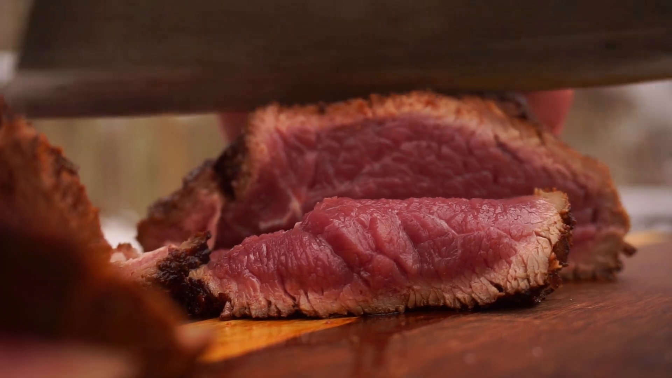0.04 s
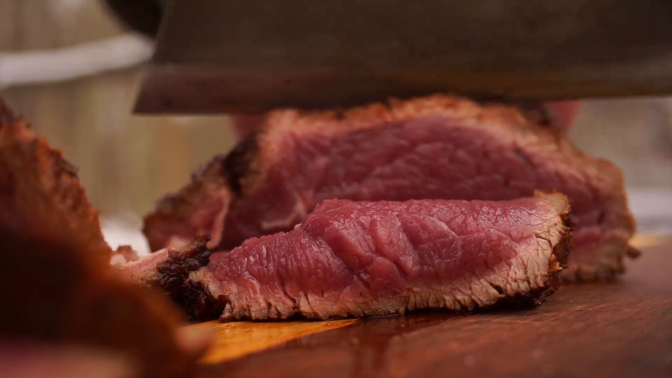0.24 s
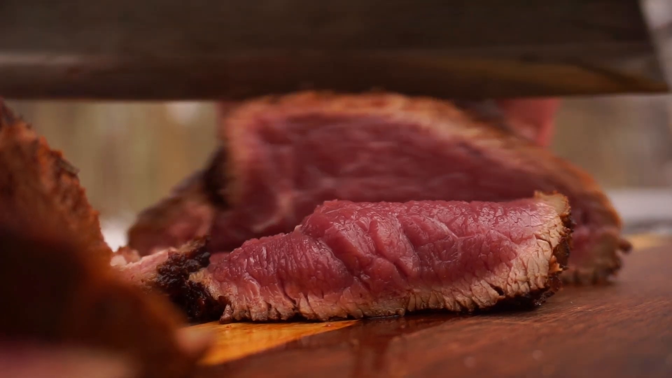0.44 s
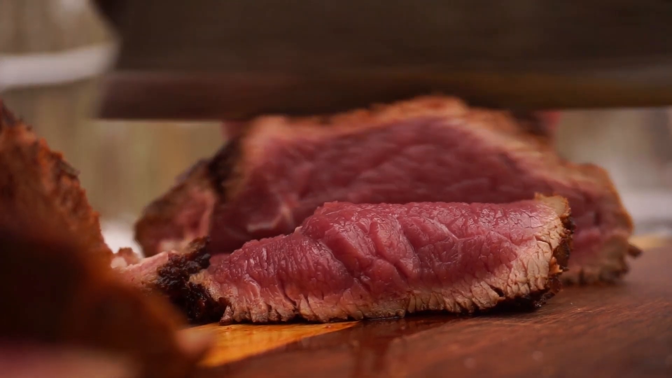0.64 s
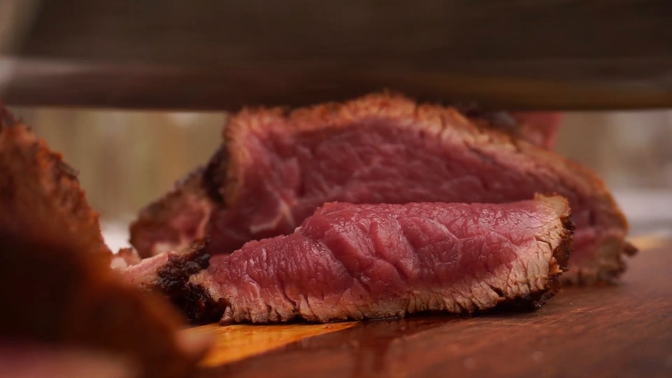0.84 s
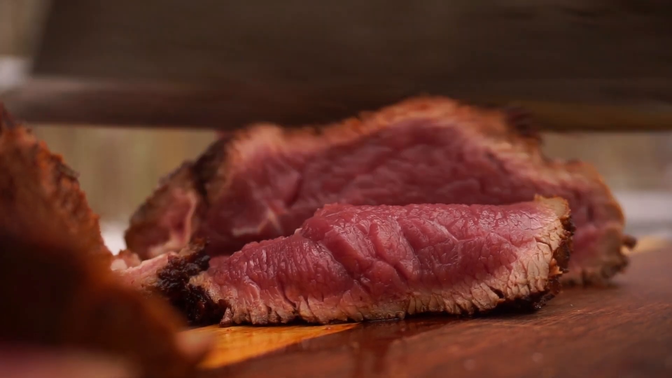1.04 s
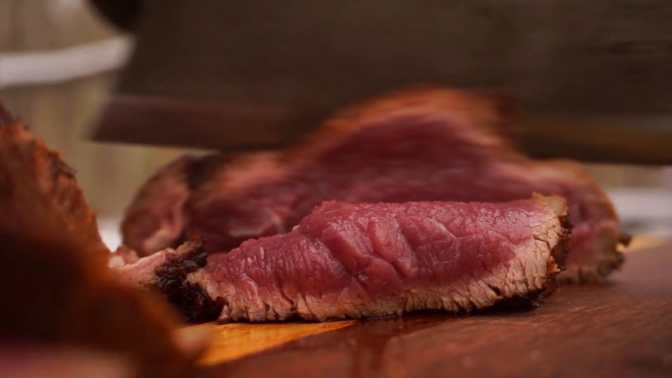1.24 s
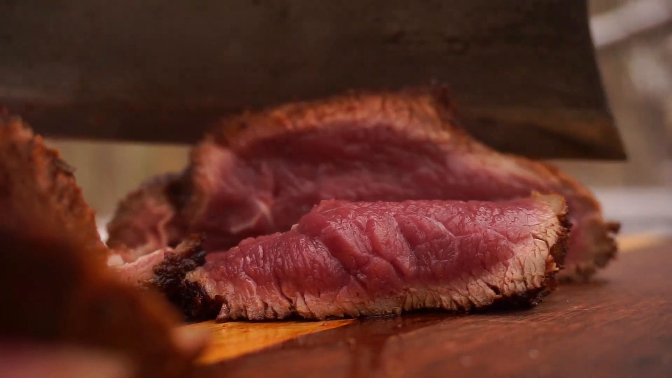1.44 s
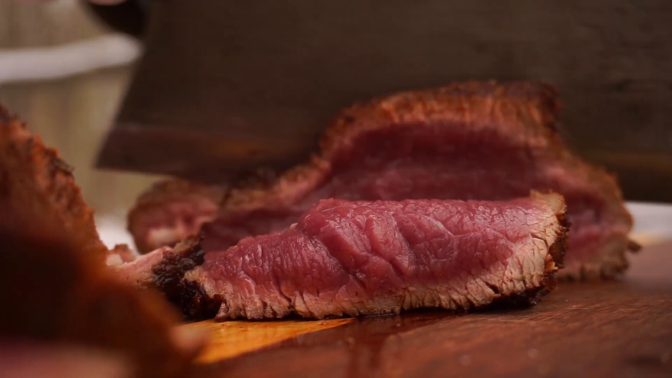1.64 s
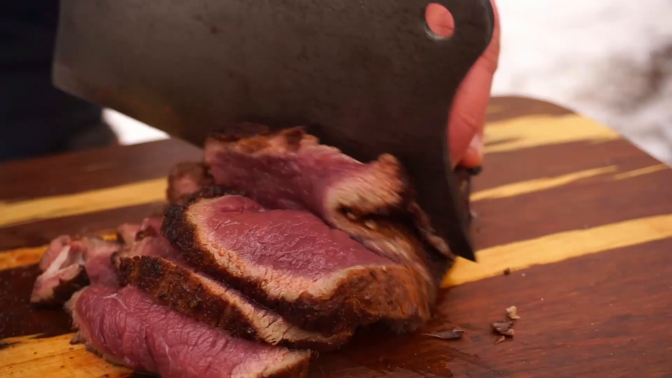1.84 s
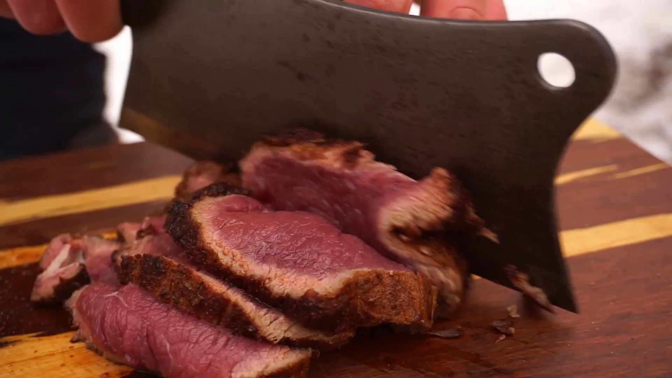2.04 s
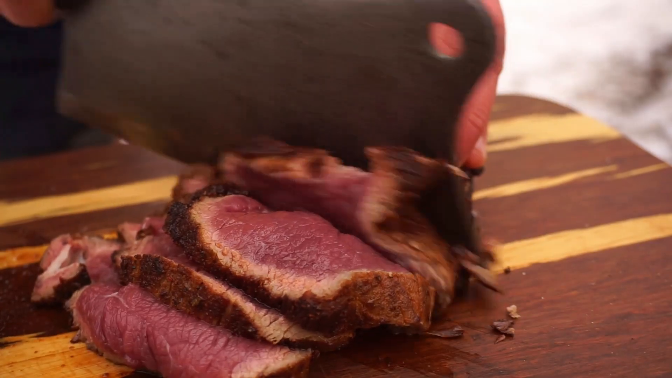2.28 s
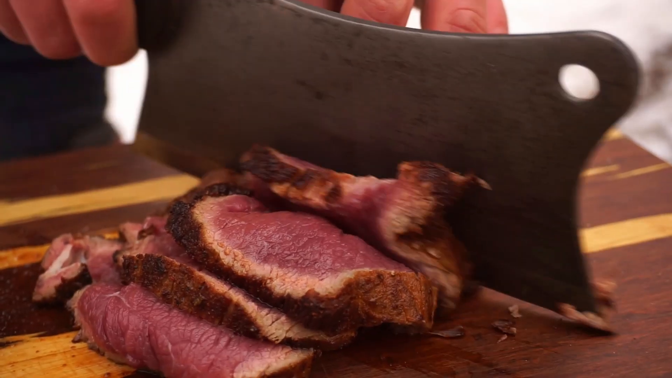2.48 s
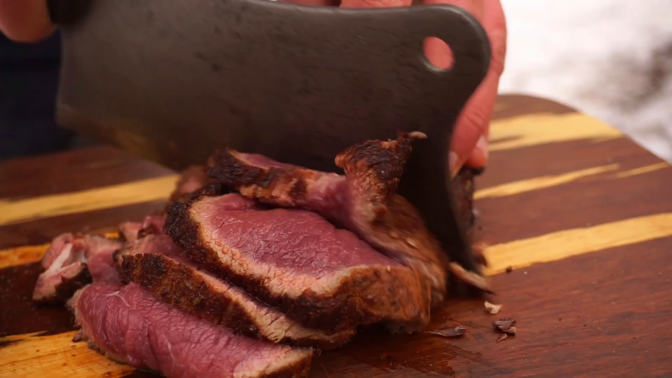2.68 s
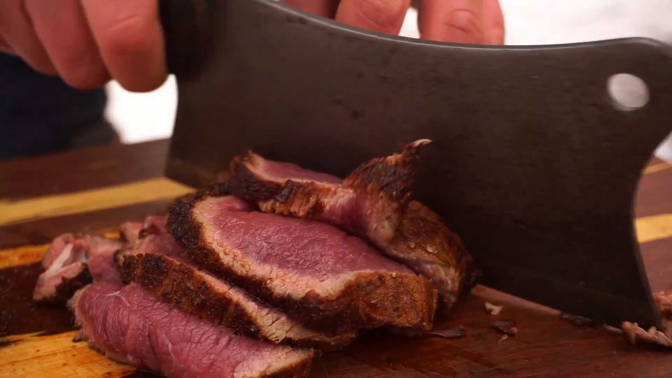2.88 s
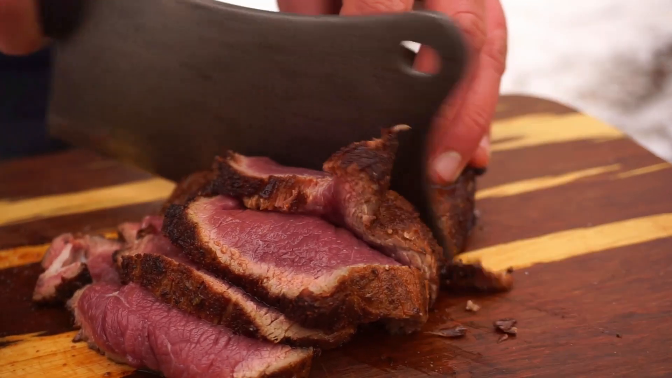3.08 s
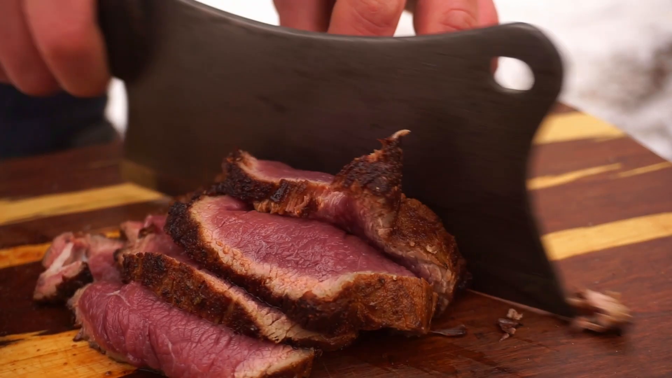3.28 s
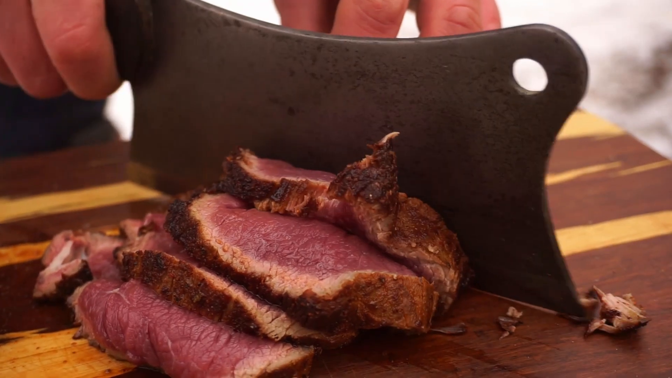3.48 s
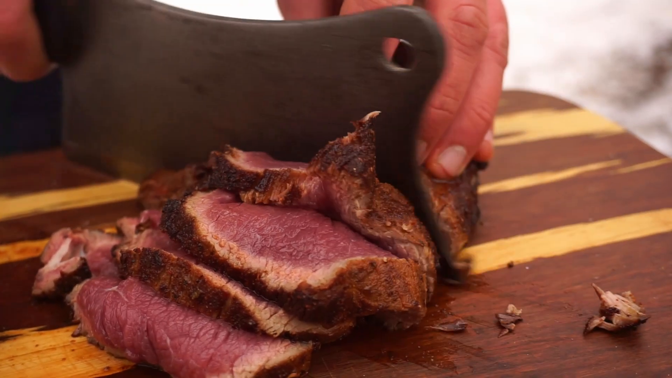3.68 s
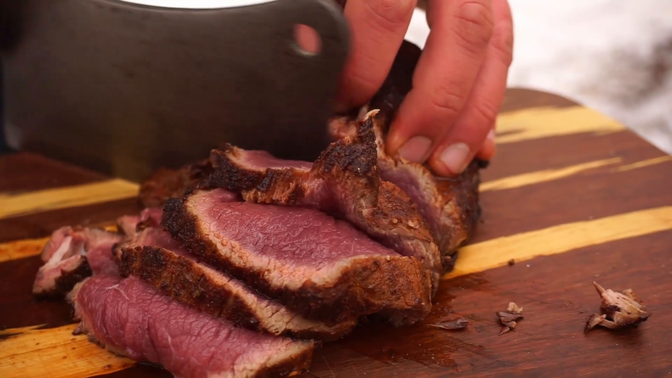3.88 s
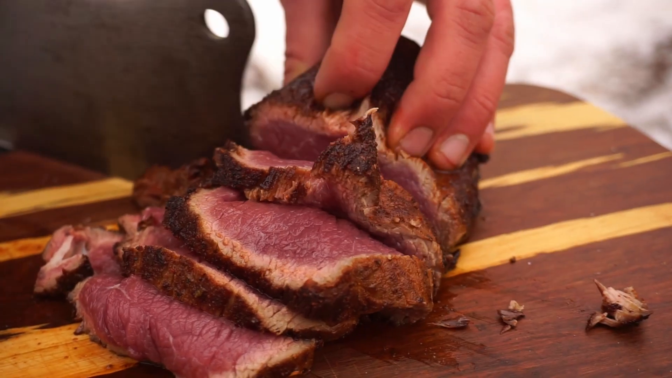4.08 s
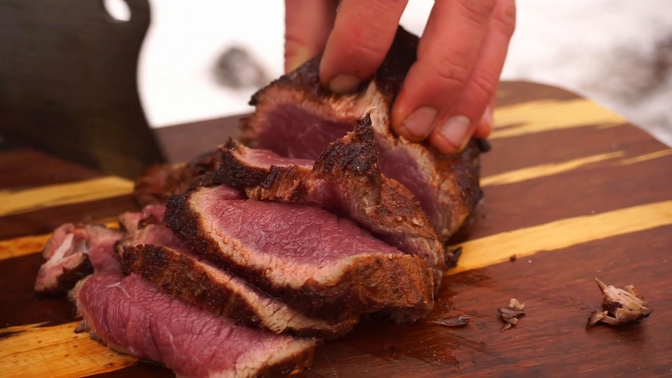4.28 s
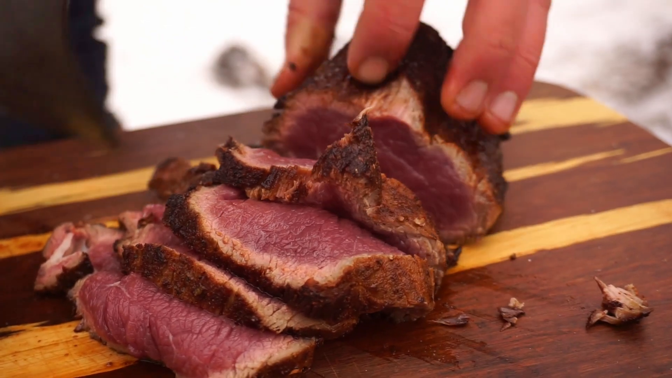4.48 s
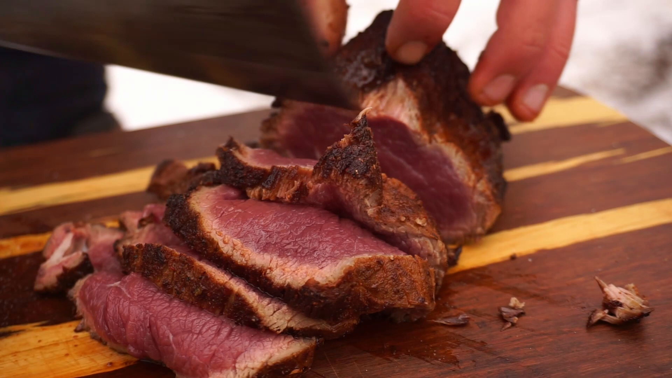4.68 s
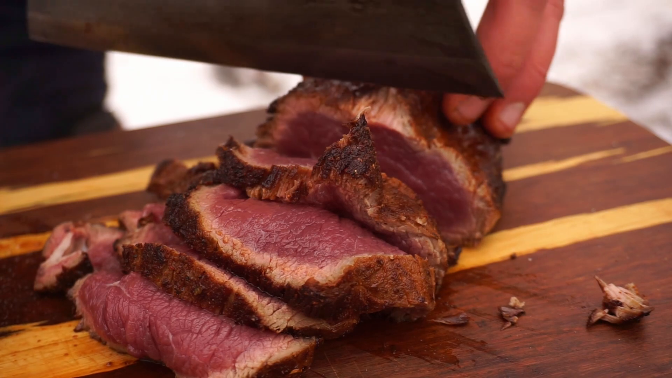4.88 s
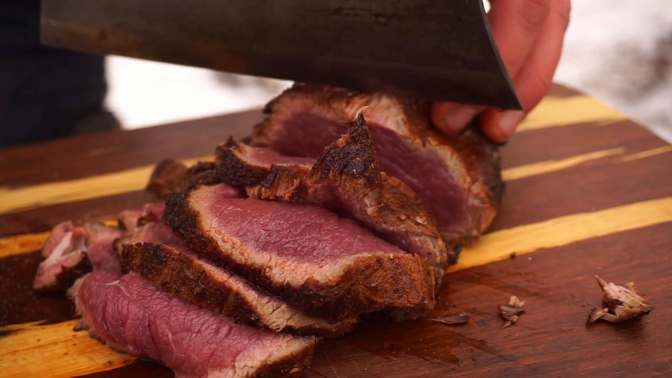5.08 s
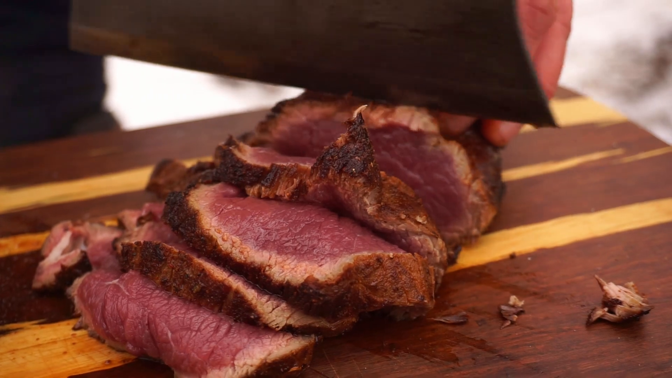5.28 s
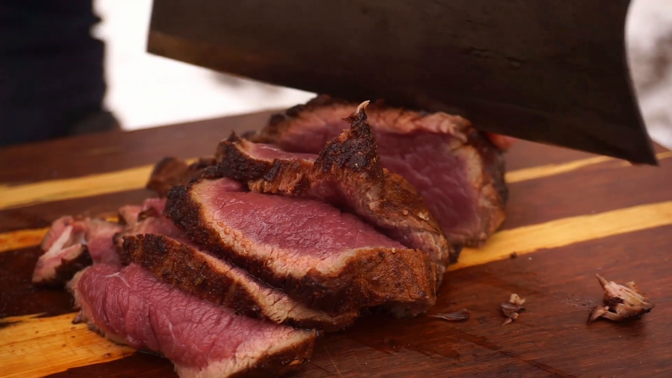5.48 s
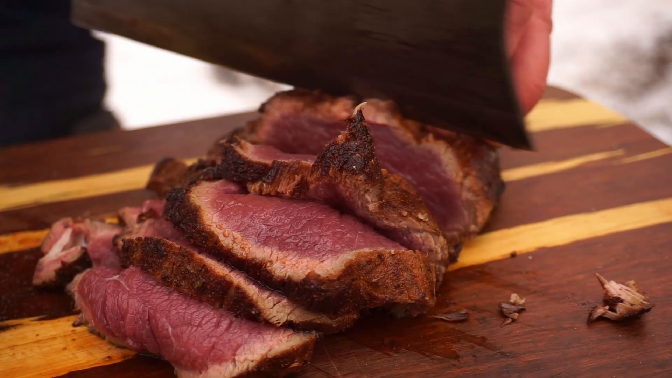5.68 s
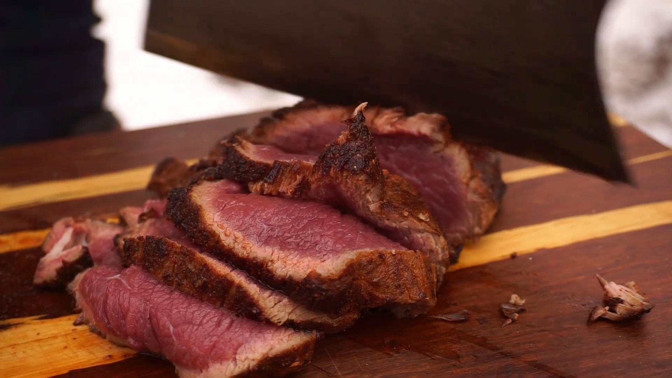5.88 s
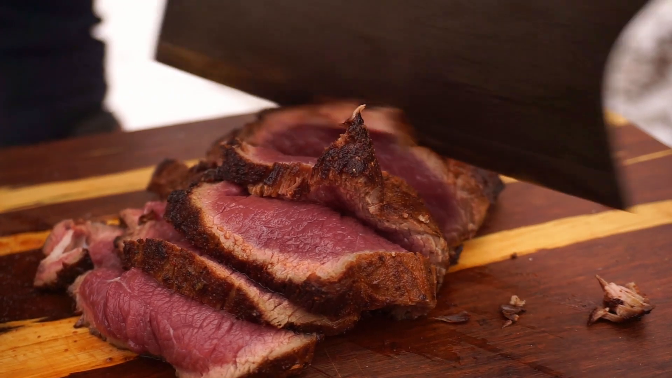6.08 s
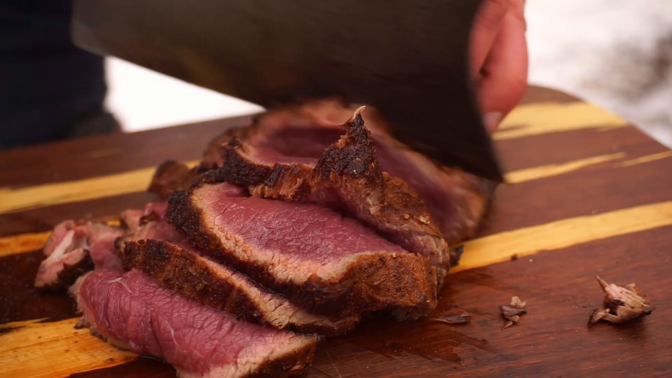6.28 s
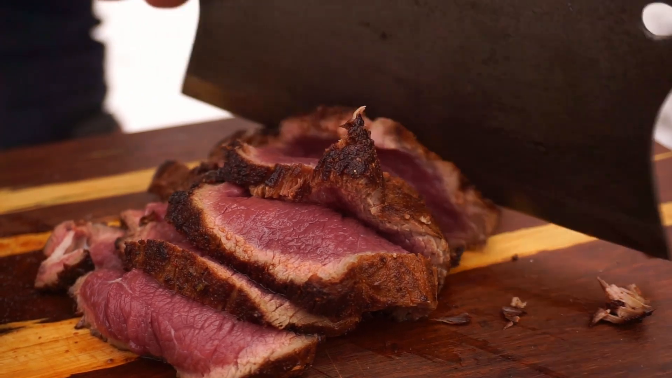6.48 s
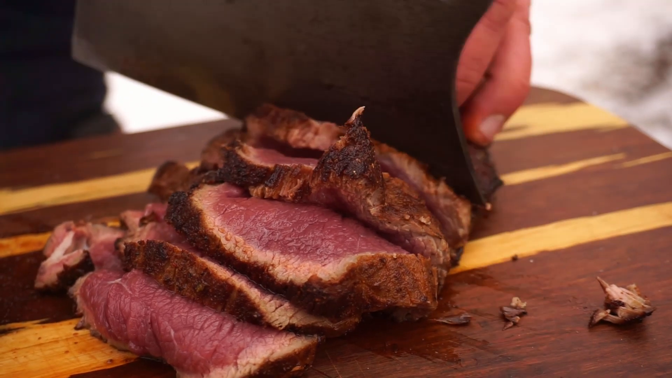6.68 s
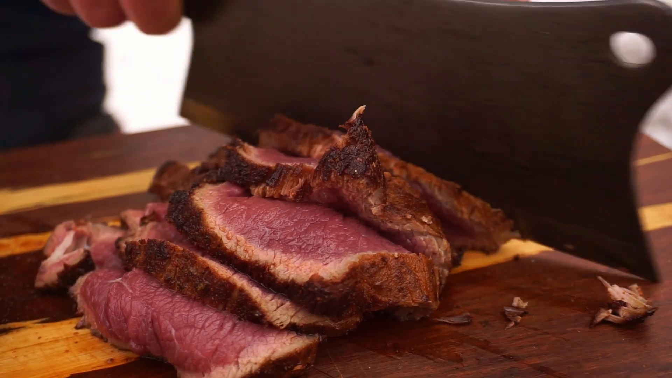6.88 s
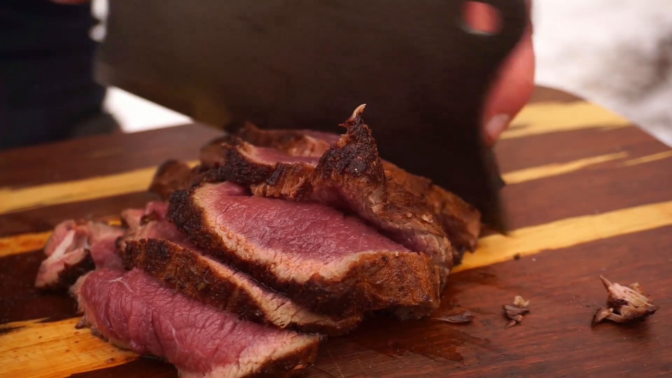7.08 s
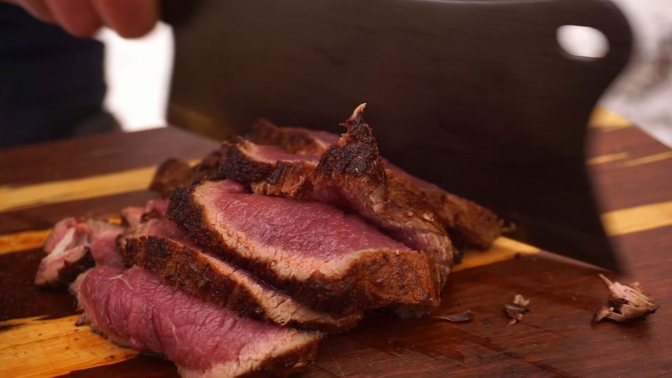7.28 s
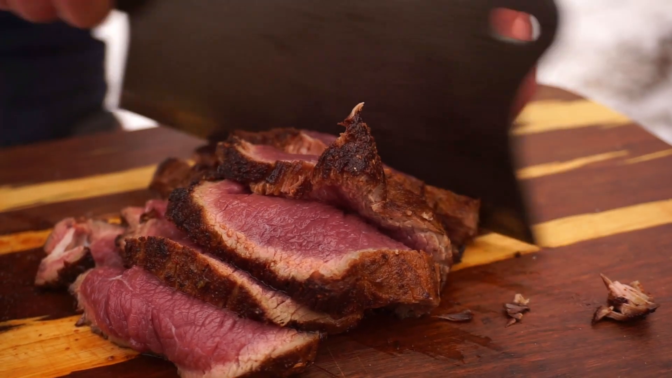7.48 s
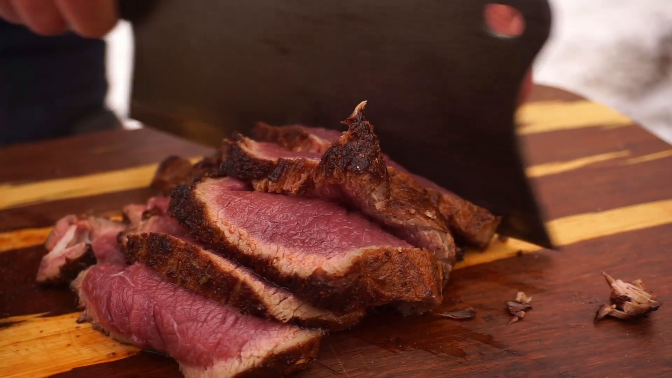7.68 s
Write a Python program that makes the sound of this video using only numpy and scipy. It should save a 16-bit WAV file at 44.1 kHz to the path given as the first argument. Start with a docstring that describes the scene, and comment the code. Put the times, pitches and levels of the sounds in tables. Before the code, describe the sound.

Close stereo pickup of a heavy steel blade sawing seared meat on a wooden board outdoors. Soft fibrous strokes with faint squeaks and crackles come first, then a hard knock and louder woody rasps. A scraping drag follows, then near quiet, gentler slicing, and one loudest sharp knock near the end. Faint wide airy rush; thin bass.

```python
"""Cleaver through seared steak, outdoors

A heavy blade saws meat on a wooden board in still air, heard in stereo over a wide soft rush of shaped noise.
Trains of tiny random slips ring wood and steel modes; flickering noise bands are the tearing fibre.
Filtered noise makes the steel squeaks, short pushes into the board modes make the knocks,
and decaying noise bursts make the snaps of crust and juice. The microphone is thin in the bass.
"""
import sys
import numpy as np
from scipy import signal
from scipy.fft import rfft, irfft, next_fast_len
from scipy.io import wavfile
from scipy.ndimage import map_coordinates

SR = 44100
rng = np.random.default_rng(int(sys.argv[2]) if len(sys.argv) > 2 else 0)


def output_pcm(signal):
    """Save a mono or channel-first signal as 16-bit PCM at the path in sys.argv[1].

    Samples are clipped to [-1, 1] before scaling.
    """
    pcm = np.clip(np.atleast_2d(signal).T, -1, 1) * 32767
    wavfile.write(sys.argv[1], SR, np.round(pcm).astype(np.int16))


N = 340893
PADDED = next_fast_len(N)

# background rush: f/Hz, density/dB per Hz (relative)
RUSH_SPECTRUM = [(60, -16.5), (200, -12), (400, -5.5), (650, -5.5), (860, -3), (1040, -4.5), (1300, 0.5),
                 (2050, -4.5), (2500, -1), (3000, -7.5), (3500, -4.5), (5000, -10), (9000, -12.5),
                 (12500, -13.5), (16000, -15.5)]
# its treble before the stereo tilt: t/s, level/dB
RUSH_TREBLE = [(0.0, -64), (3.21, -58.5), (3.34, -59), (4.11, -57), (5.1, -61.5), (6.59, -60.5),
               (7.73, -58)]
# left-right likeness of the rush: f/Hz, likeness/-1 to 1
RUSH_LIKENESS = [(60, 0.24), (180, 1), (550, 0.18), (1650, -0.14), (4970, -0.18), (15000, 0.26)]
# sawing strokes: fastest t/s, rise/s, fall/s,
# then gain/dB of edge on wood, low plate modes, high plate modes, tearing fibre
SAW_STROKES = [(0.13, .17, .27, -65, -54, -57, -58.5), (0.372, 0.061, 0.19, -66, -54, -52.5, -53.5),
               (0.643, .15, .16, -64, -53.5, -56.5, -54.5), (0.87, 0.08, 0.12, -72, -55, -53, -56.5),
               (1.161, 0.23, 0.065, -59.5, -51.5, -57, -56.5), (1.302, .038, 0.21, -68, -83, -68, -59.5),
               (1.665, .16, .055, -55.5, -47, -52, -54.5), (1.829, 0.088, 0.047, -67, -57.5, -63, -55.5),
               (2.009, 0.19, 0.15, -60.5, -54.5, -56.5, -57.5),
               (2.181, 0.11, 0.19, -58.5, -53.5, -56, -58.5), (2.437, .16, 0.093, -55.5, -47.5, -49.5, -53),
               (2.602, 0.14, .16, -47.5, -43.5, -48.5, -56.5), (2.796, 0.087, .22, -47.5, -42, -46, -54.5),
               (2.834, 0.01, 0.12, -30, -30, -37, -54.5), (3.011, 0.0055, 0.015, -31, -44, -55, -65),
               (3.058, .12, 0.049, -30.5, -30, -40, -49.5), (3.12, 0.049, .08, -54, -55, -53, -62),
               (3.298, 0.1, 0.1, -32.5, -31.5, -41.5, -50.5), (3.687, 0.2, 0.11, -37, -37, -44.5, -55.5),
               (5.59, 1, .48, -74, -60, -61.5, -62.5), (5.92, 0.12, .2, -75, -61.5, -57, -57.5),
               (6.188, 0.26, 0.17, -68, -56.5, -60, -57.5), (6.436, 0.2, 0.11, -61, -52.5, -53.5, -48),
               (6.586, 0.18, 0.47, -65.5, -56.5, -57, -57), (6.801, 0.053, .25, -67, -59, -53.5, -53),
               (6.914, .18, 0.14, -52.5, -52.5, -61, -79), (6.931, 0.0071, 0.021, -41, -67, -70, -70),
               (7.04, 0.12, 0.22, -63, -52.5, -54, -54.5), (7.3, 0.13, 0.14, -45.5, -48, -49, -53.5),
               (7.302, 0.02, 0.097, -21.5, -41, -45.5, -59), (7.439, .052, 0.045, -44.5, -43, -53.5, -60),
               (7.51, .184, 0.24, -59, -58.5, -59, -63), (7.732, 0.1, .05, -46.5, -42, -55, -58.5)]
# long drag across the board: t/s, gain/dB of wood, low plate, high plate, fibre
DRAG_GAINS = [(3.74, -53, -44.5, -52, -66), (3.796, -48.5, -44, -53, -62), (4.228, -43, -42, -50, -66),
              (4.316, -29.5, -44, -43, -59), (4.326, -26.5, -45, -41, -59), (4.386, -27, -47, -47.5, -63),
              (4.424, -29, -53.5, -54, -57), (4.446, -61, -54, -65, -67), (4.514, -71, -71, -73, -80),
              (4.52, -79, -65, -64, -70)]
# how far the plate lies over in the drag: t/s, share/0-1
LYING_SHARE = [(3.7, 0), (3.8, 1), (4.45, 1), (4.55, 0)]
# board modes: f/Hz, width/Hz (filters broaden or narrow it), level/dB (relative)
BOARD_MODES = [(265, 74, -19.5), (371, 59, -17), (472, 65, -3.5), (542, 111, -5), (684.4, 56, 0),
               (755.7, 46, 0), (843, 81, -2.5), (1038, 82, -16.5), (1235, 55, -4), (1900, 420, -12.5),
               (2140, 490, -18), (2880, 35, -14)]
# upright steel plate, damped by the meat: f/Hz, width/Hz of the narrower filter, level/dB (relative)
UPRIGHT_MODES = [(1163, 350, -7.5), (1680, 180, -3), (1936, 280, -2), (2328, 253, 0), (2786, 150, -1),
                 (3030, 97, 4.5), (3930, 860, -7), (4810, 400, -5), (5090, 750, -7.5), (5860, 156, -7),
                 (6370, 760, -12.5), (7184, 108, -5.5), (7950, 76, -39), (9200, 54, -24)]
# plate lying over: f/Hz, width/Hz of the narrower filter, level/dB (relative)
LYING_MODES = [(1250, 280, -4.5), (1830, 140, -2.5), (2140, 110, 0.5), (2920, 260, 3), (3950, 390, -7.5),
               (4670, 270, -9), (5460, 230, -5), (6600, 200, -9.5), (7550, 140, -12.5), (9600, 220, -24)]
# tearing fibre: f/Hz, density/dB per Hz (relative)
FIBRE_SPECTRUM = [(3000, -37), (5000, -8), (8000, -3), (10000, -4), (13000, -7.5), (16000, -7.5)]
# left-right likeness of rubbing, fibre and squeaks: f/Hz, likeness/0-1
RUB_LIKENESS = [(60, 0.92), (180, 1), (550, 0.94), (1650, 0.93), (4970, 0.24), (15000, 0.054)]
# stereo tilt of rubbed modes: f/Hz, left minus right/dB
RUB_TILT = [(60, 1.0), (180, -7.5), (550, 3), (1650, -5.5), (4970, -1.5), (15000, 4)]
# squeaks of one steel mode: start t/s, length/s, f/Hz, width/Hz of the narrower filter,
# level/dB rms before swell and tilt
STEEL_SQUEAKS = [(0.074, .13, 1730, 101, -61.5), (0.14, 0.07, 5300, 90, -56), (0.59, 0.18, 1720, 80, -59),
                 (0.593, 0.086, 2920, 65, -64), (1.008, 0.028, 7140, 30, -46),
                 (2.138, 0.083, 7050, 40, -58.5), (4.212, 0.18, 7500, 50, -59),
                 (4.276, 0.046, 4020, 190, -42.5), (6.179, 0.051, 5700, 120, -53),
                 (6.35, 0.09, 5640, 120, -61), (7.022, 0.13, 6930, 200, -53.5),
                 (7.305, 0.055, 2260, 130, -32)]
# crust and juice snaps: t/s, crackle peak level/dB, centre f/Hz, decay/ms, left minus right/dB
FOOD_SNAPS = [(0.1484, -35.5, 5270, 1.8, -1), (0.343, -38, 5160, 1.4, 1), (0.7503, -39, 5700, 2.3, -2),
              (1.002, -40, 6950, 1.2, -5), (1.0061, -31, 6500, 5, -7), (1.1658, -38, 5200, 1.6, -2),
              (1.434, -38.5, 11500, 2.1, -3.5), (1.7544, -41, 11100, 2, -6), (2.029, -28.5, 5600, 1.3, -2),
              (2.3558, -33, 5740, 1.5, -2.5), (2.5802, -33, 7090, 1.1, -4.5), (2.824, -28, 4800, 2.9, -3),
              (2.855, -24, 4670, 1.3, -5), (2.9844, -30, 6070, 1.1, -3), (3.153, -34, 9340, 1.6, -3.5),
              (3.638, -31, 4900, 1, -14), (3.671, -27, 6800, 1, 0), (3.757, -39, 5500, 1, 3),
              (4.1663, -35.5, 8000, 1.4, -6), (4.5205, -39, 6050, 1.5, -7), (6.0845, -32.5, 5000, 3, -9.5),
              (6.319, -31.5, 4350, 2.2, -2.5), (6.326, -39, 4200, 1.5, -8), (6.3419, -28.5, 4280, 4.9, -4),
              (6.351, -36, 4200, 1.5, -13), (6.556, -37, 4080, 1.2, -6), (6.8683, -30.5, 12400, 0.68, -8),
              (7.324, -32, 11000, 1, -16), (7.596, -39, 12100, 2.1, -12)]
# edge or meat meets the board: t/s, peak level/dB before thump, sharpness/dB per octave, left minus right/dB
BOARD_KNOCKS = [(1.723, -44, 7.5, -2), (2.028, -39.5, 17, 1), (2.8295, -15, -1, 4), (2.907, -28, -2, 5),
                (3.605, -29, -8, 0), (5.632, -39.5, 20, -10), (5.642, -46, 1, -1), (5.65, -47, 2, -1),
                (5.75, -42, 11.5, -11), (5.753, -39.5, 5, 5), (5.801, -35, 12.5, -8),
                (6.275, -38.5, 7.5, 2), (6.928, -33, -14, -1), (7.2896, -8.5, 2.5, -5), (7.694, -38, 8, 1)]

SPEED_POWER = 1.95   # loudness grows as blade speed to this power
DRAG_FADE_S = .05
RUMBLE_DB, RUMBLE_HZ = -32, 60   # the table shakes under a scrape
BEND_SHARE, BEND_PER_S = .025, 6.0   # lying modes slide as the contact point moves
DAMPED_DB, DAMPED_ABOVE_HZ = 8.5, 2300   # on wood, upper low modes fade and the rest come up
CRUST_RING_DB, JUICE_RING_DB = -11.5, -18   # crust rings the steel, thin high juice pops hardly do
JUICE_ABOVE_HZ = 7500
BOUNCE_S, BOUNCE_DB, HEAVY_DB = 0.003044, 0.5, -20   # blows above HEAVY_DB land twice
THUMP_DB, THUMP_HZ, THUMP_S = -14.5, 55, .006   # table thump under every knock
MIC_LOW_CUT_HZ, CUTOFF_HZ = 319, 16000


def from_db(db):
    """Gain of a level."""
    return 10 ** (np.asarray(db) / 20)


def rms_one(x):
    """Scale to rms 1."""
    return x / np.sqrt(np.mean(x ** 2) + 1e-20)


def in_time(rows):
    """Columns of a curve, one value per sample."""
    s, *columns = np.transpose(rows)
    return [np.interp(np.arange(N) / SR, s, column) for column in columns]


def at_hz(points, hz):
    """Read a spectrum on a log frequency axis."""
    points_hz, values = np.transpose(points)
    return np.interp(np.log(hz), np.log(np.maximum(points_hz, 1)), values)


def band_rms(x, low, high):
    """Rms within a band, averaged in power over the channels."""
    power = np.abs(rfft(x, PADDED)) ** 2
    hz = np.linspace(0, SR / 2, PADDED // 2 + 1)
    inside = (hz > low) & (hz < high)
    return np.sqrt(2 * np.mean(power[..., inside].sum(axis=-1)) / (N * PADDED))


def drift(rate):
    """Slow random wander of rms 1, twice low-passed at rate in Hz."""
    r = np.exp(-80 * np.pi * rate / SR)   # one value per 40 samples
    white = rng.standard_normal(N // 40 + 2002)
    slow = signal.lfilter([1], [1, -2 * r, r * r], white)[2000:]
    return np.interp(np.arange(N) / 40, np.arange(len(slow)), rms_one(slow))


def panned(x, pan_db):
    """Tilt left against right by pan_db."""
    return x * from_db(np.array([[pan_db / 2], [-pan_db / 2]]))


def spread(pair, alike):
    """Left and right from a shared and an opposed part."""
    alike = np.clip(alike, -1, 1)
    shared = np.sqrt(1 + alike) * pair[0]
    opposed = np.sqrt(1 - alike) * pair[1]
    return shared + opposed * [[1], [-1]]


def resonance(x, hz, width_hz):
    """Two-pole mode, gain 1 on top."""
    r = np.exp(-np.pi * width_hz / SR)
    poles = [1, -2 * r * np.cos(2 * np.pi * hz / SR), r * r]
    return signal.lfilter([(1 - r * r) / 2, 0, (r * r - 1) / 2], poles, x + 1e-18)


def coloured(pair, spectrum, alike, patchy_db, flicker_per_s):
    """Shape noise, then let overlapping bands an octave apart flicker on their own."""
    hz = np.maximum(np.linspace(0, SR / 2, PADDED // 2 + 1), 40)
    shaped = spread(rfft(pair, PADDED) * from_db(at_hz(spectrum, hz)), at_hz(alike, hz))
    octave = np.log2(hz / 40)
    out = np.zeros((2, N))
    for k in range(11):
        if 80 * 2 ** k > spectrum[0][0]:   # skip bands wholly below the spectrum
            band = irfft(shaped * np.clip(1 - np.abs(octave - k), 0, 1), PADDED)[:, :N]
            out += from_db(patchy_db * drift(flicker_per_s)) * band
    return out


def rush():
    """Smooth wide noise behind the board, slightly louder on the right."""
    noise = rng.standard_normal((2, N))
    air = coloured(noise, RUSH_SPECTRUM, RUSH_LIKENESS, patchy_db=0.6, flicker_per_s=5.9)
    level = from_db(in_time(RUSH_TREBLE)[0])
    return panned(level * air / band_rms(air, 7230, 18600), -3.5)


def grains(per_s, uneven_db):
    """Two trains of tiny slips, random in time, size and sign."""
    unevenness = np.minimum(rng.exponential(1, (2, N)), 5)
    sizes = from_db(uneven_db * unevenness) * rng.choice([-1, 1], (2, N))
    return sizes * (rng.random((2, N)) < per_s / SR)


def rubbed(modes, slips, wander_db, low, high):
    """Slips ring every mode; the moving contact point makes each wax and wane. Rms 1 from low to high."""
    out = np.zeros((2, N))
    for k, (hz, width, db) in enumerate(modes):
        ringing = resonance(resonance(slips, hz, width), hz, 3.15 * width)
        stereo = panned(spread(ringing, at_hz(RUB_LIKENESS, hz)), at_hz(RUB_TILT, hz))
        out += (-1) ** k * from_db(db + wander_db * drift(15.0)) * stereo   # neighbours in opposite sign
    return out / band_rms(out, low, high)


def bent(x):
    """Play slightly faster and slower, so that every mode slides."""
    step = 1 + BEND_SHARE * drift(BEND_PER_S)
    place = np.clip(np.cumsum(step / step.mean()), 0, N - 1)
    return np.array([map_coordinates(channel, [place], order=3) for channel in x])


def plate(lying_share, slips, low, high):
    """The steel modes between low and high, crossfaded in power from upright to lying over."""
    upright_modes = [m for m in UPRIGHT_MODES if low < m[0] < high]
    lying_modes = [m for m in LYING_MODES if low < m[0] < high]
    upright = rubbed(upright_modes, slips, wander_db=3.0, low=low, high=high)
    lying = rubbed(lying_modes, slips, wander_db=1.5, low=low, high=high)
    return np.sqrt(1 - lying_share) * upright + np.sqrt(lying_share) * bent(lying)


def pressed(x, share):
    """Dull the steel by the share of the edge that bears on wood."""
    dull = signal.sosfilt(signal.butter(4, DAMPED_ABOVE_HZ, fs=SR, output="sos"), x)
    return (1 - share) * x + share * from_db(DAMPED_DB) * dull


def stroke_gains():
    """Wood, low plate, high plate and fibre: strokes swell with blade speed, the drag runs its own course."""
    t = np.arange(N) / SR
    start, end = DRAG_GAINS[0][0], DRAG_GAINS[-1][0]
    fade = np.interp(t, [start - DRAG_FADE_S, start, end, end + DRAG_FADE_S], [0, 1, 1, 0])
    power = (fade * from_db(in_time(DRAG_GAINS))) ** 2
    for s, rise, fall, *levels_db in SAW_STROKES:
        near = slice(max(int((s - rise) * SR), 0), int((s + fall) * SR))
        side_s = np.where(t[near] < s, max(rise, .003), max(fall, .003))
        speed = np.cos(np.pi / 2 * np.clip((t[near] - s) / side_s, -1, 1))
        power[:, near] += (from_db(levels_db)[:, None] * np.abs(speed) ** SPEED_POWER) ** 2
    return np.sqrt(power)


def strokes():
    """Edge rubbing wood, steel singing, fibre tearing; all judder together."""
    wood, low, high, tearing = stroke_gains()
    lying_share = np.clip(in_time(LYING_SHARE)[0], 0, 1)
    steel_slips = grains(2500, 1.88)
    fibre = coloured(grains(9000, 3.8), FIBRE_SPECTRUM, RUB_LIKENESS, patchy_db=2.0, flicker_per_s=9.6)
    low_board = [m for m in BOARD_MODES if m[0] < 1300]
    out = wood * rubbed(low_board, grains(2500, 2.84), wander_db=4.0, low=270, high=1400)
    rumble = rms_one(resonance(rng.standard_normal(N), RUMBLE_HZ, 74.0))
    out += wood * from_db(RUMBLE_DB) * rumble
    wood_share = wood ** 2 / (wood ** 2 + low ** 2 + 1e-20)
    out += low * pressed(plate(lying_share, steel_slips, 1100, 3600), wood_share)
    out += high * plate(lying_share, steel_slips, 3600, 11000)
    out += tearing * panned(fibre / band_rms(fibre, 8500, 15500), -2)
    judder = from_db(0.87 * drift(60.0))
    return judder * out


def squeaks():
    """One steel mode squeaks out: noise through two resonances under a short swell."""
    out = np.zeros((2, N))
    noise = rng.standard_normal((len(STEEL_SQUEAKS), 2, SR // 4))
    for (s, length, hz, width, db), pair in zip(STEEL_SQUEAKS, noise):
        count, at = min(int(length * SR), SR // 5), round(s * SR)
        ringing = resonance(resonance(pair, hz, width), hz, 2 * width)
        tone = rms_one(spread(ringing, at_hz(RUB_LIKENESS, hz))[:, -count:])   # settled end only
        swell = np.sin(np.pi * np.sqrt(np.arange(count) / count))
        out[:, at:at + count] += from_db(db) * tone * swell
    return panned(out, -2.5)


def snaps():
    """A short crackle around its centre, which also rings the steel modes near it."""
    out, t = np.zeros((2, N)), np.arange(int(.06 * SR)) / SR
    noise = rng.standard_normal((len(FOOD_SNAPS), len(t)))
    for (s, db, hz, decay_ms, pan_db), white in zip(FOOD_SNAPS, noise):
        burst = white * np.exp(-1000 * t / max(decay_ms, .2))
        sharp_edge = from_db(-14.5) * np.diff(burst, prepend=0)   # reaches the top of the range
        crack = resonance(burst, hz, 1.24 * hz) + sharp_edge
        nearby = resonance(burst, hz, 0.084 * hz)
        ring = sum(resonance(nearby, mode_hz, width) / width for mode_hz, width, _ in UPRIGHT_MODES)
        ring_gain = from_db(CRUST_RING_DB if hz < JUICE_ABOVE_HZ else JUICE_RING_DB)
        snap = crack / np.abs(crack).max() + ring_gain * ring / np.abs(ring).max()
        at = round(s * SR)
        out[:, at:at + len(t)] += panned(from_db(db) * snap, pan_db)[:, :N - at]
    return out


def knocks():
    """Each blow is a short push into the board modes; sharp blows favour high modes, heavy ones bounce."""
    out, t = np.zeros((2, N)), np.arange(int(.08 * SR)) / SR
    strengths_db = rng.normal(0, 2.7, (len(BOARD_KNOCKS), len(BOARD_MODES)))
    late = np.maximum(t - BOUNCE_S, 0)
    first = t * np.exp(-2 * np.pi * 4000 * t)
    second = late * np.exp(-2 * np.pi * 2000 * late) / 2
    thump_swell = t / THUMP_S * np.exp(-t / THUMP_S)
    thump = from_db(THUMP_DB) * np.sin(2 * np.pi * THUMP_HZ * t) * thump_swell
    for (s, db, sharp_db, pan_db), extra_db in zip(BOARD_KNOCKS, strengths_db):
        push = first - (db > HEAVY_DB) * from_db(BOUNCE_DB) * second
        blow = np.zeros(len(t))
        for (hz, width, mode_db), extra in zip(BOARD_MODES, extra_db):
            ringing = resonance(resonance(push, hz, width + 0.038 * hz), hz, 0.48 * hz)
            blow += from_db(mode_db + extra + sharp_db * np.log2(hz / 700)) * ringing
        knock = from_db(db) * (blow / np.abs(blow).max() + thump)
        at = round(s * SR)
        out[:, at:at + len(t)] += panned(knock, pan_db)[:, :N - at]
    return out


def scene():
    """Rush, blade, food and board together."""
    return rush() + strokes() + squeaks() + snaps() + knocks()


def record(dry):
    """The microphone cuts the bass, the recorder the top."""
    thin = signal.sosfilt(signal.butter(2, MIC_LOW_CUT_HZ, "high", fs=SR, output="sos"), dry)
    # 60 dB down from the cutoff upward
    return signal.sosfilt(signal.cheby2(22, 60, CUTOFF_HZ, fs=SR, output="sos"), thin)


dry = scene()
out = record(dry)
output_pcm(out)
```